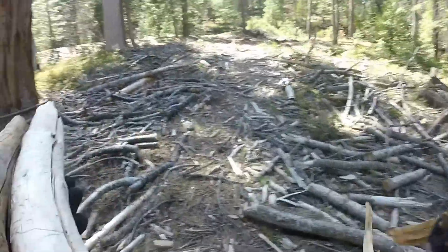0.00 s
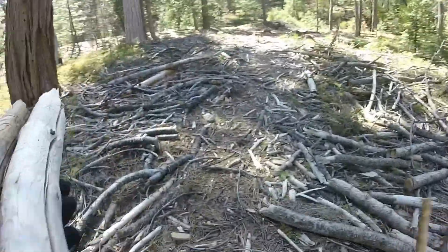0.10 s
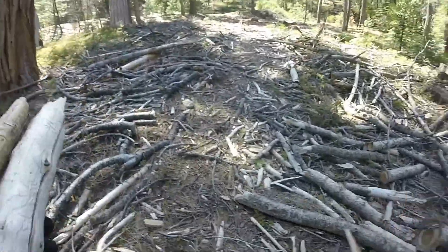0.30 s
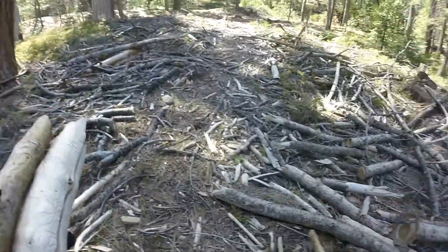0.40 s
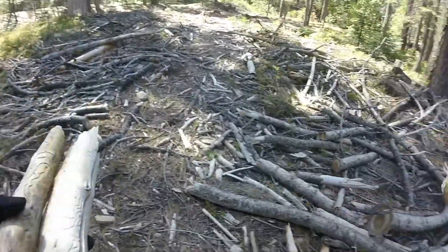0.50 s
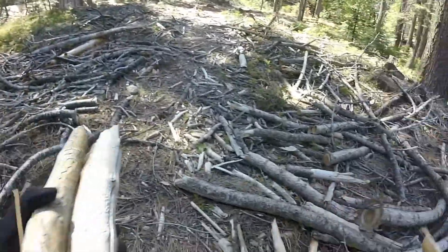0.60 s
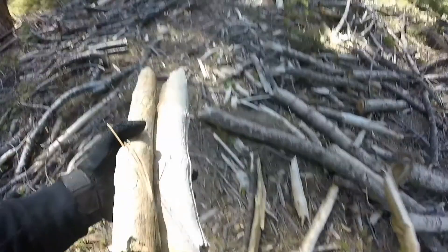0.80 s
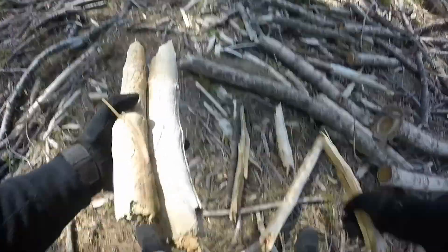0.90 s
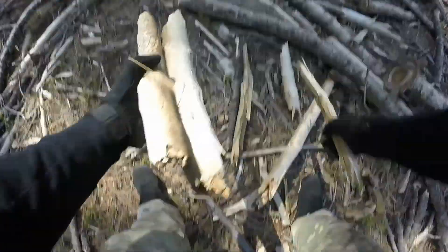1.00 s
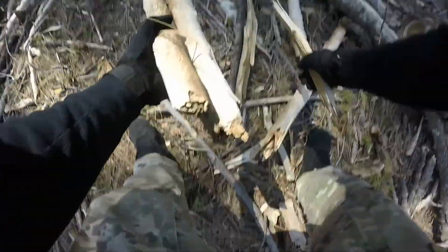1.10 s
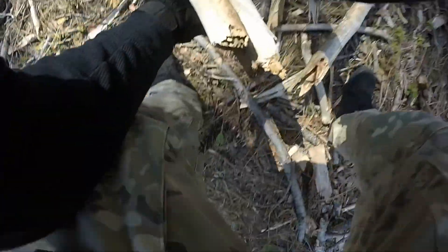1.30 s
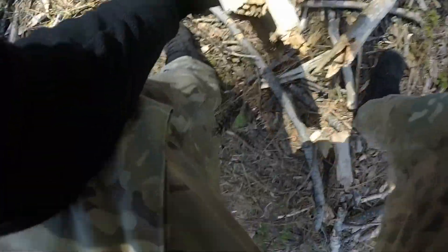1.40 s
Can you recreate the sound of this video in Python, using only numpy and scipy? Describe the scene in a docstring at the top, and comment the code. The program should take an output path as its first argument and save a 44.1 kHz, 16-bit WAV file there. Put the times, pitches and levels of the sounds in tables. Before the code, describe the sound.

Rotten dry wood cracks in a quick splintering cluster, pieces thudding on forest litter, then two logs knock together hollowly several times; gloves and bark rustle softly, light wind rumbling on a close body-worn microphone.

```python
"""Forest: rotten dry wood is broken by hand. Fibres crack as sprays of clicks, pieces thud on the litter as a
short push rings their modes, a thin stick taps likewise, and two held logs knock with a hollow, swelling ring.
Gloves, bark and needles rustle throughout as grainy coloured noise; light wind rumbles on the microphone.
"""
import sys
import numpy as np
from scipy import signal
from scipy.fft import rfft, irfft, next_fast_len
from scipy.io import wavfile
from scipy.ndimage import map_coordinates

SR = 44100
rng = np.random.default_rng(int(sys.argv[2]) if len(sys.argv) > 2 else 0)


def gain_from_db(level_db):
    """Turn a decibel level (scalar or array-like) into a linear amplitude factor."""
    decades = np.asarray(level_db, float) / 20
    return 10 ** decades


def inscribe(sig):
    """Save sig as 16-bit PCM at rate SR to the path in sys.argv[1].

    A 1-D sig is mono; a 2-D sig holds one channel per row.
    Samples are clipped to [-1, 1] before scaling.
    """
    pcm = np.round(np.clip(np.atleast_2d(sig).T, -1, 1) * 32767)
    wavfile.write(sys.argv[1], SR, pcm.astype(np.int16))


N = 66150


def along(points, hz):
    """Interpolate (f/Hz, level/dB) points on a log frequency axis."""
    f, v = np.transpose(points)
    return np.interp(np.log(hz + 1), np.log(f + 1), v)


def curves(rows):
    """One value per sample for each column after the time."""
    s, *cols = np.transpose(rows)
    return [np.interp(np.arange(N) / SR, s, c) for c in cols]


def wobble(knots_per_s):
    """Smooth random curve through normally distributed knots."""
    knots = rng.standard_normal(int(N * knots_per_s / SR) + 4)
    return map_coordinates(knots, [np.arange(N) * knots_per_s / SR])


def add(out, s, peak_db, x):
    """Mix a sound in at a time and peak level."""
    start = max(round(s * SR), 0)
    out[start:][:len(x)] += gain_from_db(peak_db) * x / np.abs(x).max()


def resonance(f, centre_hz, width_hz):
    """Second-order band-pass response, unity at its centre."""
    damping = 1j * f * width_hz
    return damping / (centre_hz ** 2 - f * f + damping)


def ring(modes, pitch, t):
    """Sum of decaying sine modes of a piece of wood, their levels scattered at each strike."""
    scatter_db = 1.5
    hz, db, t60_s = np.transpose(modes)[:, :, None]
    db = db + rng.normal(0, scatter_db, db.shape)
    return np.sum(gain_from_db(db - 60 * t / t60_s) * np.sin(2 * np.pi * hz * pitch * t), axis=0)


def rush(spectrum, grainy_db, grains_per_s):
    """Noise with flickering level, coloured by a spectrum in dB per Hz and scaled to rms 1."""
    m = next_fast_len(N + 8192)
    noise = rng.standard_normal(N) * gain_from_db(grainy_db * wobble(grains_per_s))
    colour = gain_from_db(along(spectrum, np.fft.rfftfreq(m, 1 / SR)))
    y = irfft(rfft(noise, m) * colour, m)[:N]
    return y / y.std()


# fibres tearing: t/s, peak level before the bass cut/dB, t60/s, centre f/Hz, broad treble re centre/dB
FIBRE_CRACKS = [(.0004, -28, 0.021, 3200, -15), (.042, -35.5, 0.077, 5700, -9),
                (.064, -28.5, 0.038, 2070, -28), (0.128, -21.5, 0.011, 3200, -2),
                (0.1461, -35, .02, 2100, -30), (0.171, -30.5, 0.0078, 2180, -42),
                (0.2108, -12, 0.025, 3220, -19), (0.2149, -10.5, 0.0092, 4760, -25),
                (0.2144, -15, 0.013, 2130, -38), (0.2234, -31, 0.066, 4600, -47),
                (0.2738, -24, 0.021, 2500, -7), (0.2928, -20, 0.024, 2650, -3.5),
                (0.3255, -15, 0.012, 2310, -21), (0.3358, -9.5, 0.031, 2520, -23.5),
                (0.347, -31.5, 0.052, 4600, -22), (0.4129, -27, 0.058, 2440, -17.5),
                (0.4684, -18, 0.032, 2000, -30), (.785, -43, 0.035, 4840, -1),
                (1.1483, -15.5, 0.012, 1730, -51), (1.1486, -41, 0.021, 5100, -10),
                (1.4942, -24.5, 0.099, 4080, -56)]


def cracks():
    """Each crack: a dying spray of fibre clicks in its own band, unevenly coloured, with crumbs trailing."""
    clicks_per_s, width_over_centre = 5100, 0.93
    crumbs_db, crumbs_t60_s = -29.5, 0.08
    reflection_db, reflection_max_s = -6.5, 0.000804  # short reflections off the ground colour each crack unevenly
    out, size = np.zeros(N + SR), 8192
    t, f = np.arange(size) / SR, np.fft.rfftfreq(size, 1 / SR) + 1
    treble = (1j * f / (4000 + 1j * f)) ** 2 / (1 + 1j * f / 9000)
    crumbs = gain_from_db(crumbs_db - 60 * t / crumbs_t60_s)
    for s, peak_db, t60_s, centre_hz, treble_db in FIBRE_CRACKS:
        chance, height = rng.random((2, size))
        clicks = (chance < clicks_per_s / SR) * (2 * height - 1) ** 3
        clicks += 0.79 * (t == 0) + 0.021 * rng.standard_normal(size)  # first snap, fine hiss
        spray = clicks * (gain_from_db(-60 * t / t60_s) + crumbs)
        band = resonance(f, centre_hz, width_over_centre * centre_hz) ** 3
        delay_s = reflection_max_s * rng.random((2, 1))
        uneven = np.prod(1 + gain_from_db(reflection_db) * np.exp(-2j * np.pi * f * delay_s), axis=0)
        crack = irfft(rfft(spray) * uneven * (band + gain_from_db(treble_db) * treble), size)
        add(out, s, peak_db, crack[:size // 2])
    return out[:N]


def strike(modes, hits):
    """A half-sine push, as long as the contact, rings the modes; the slope of the motion is heard."""
    out, t = np.zeros(N + SR), np.arange(SR // 8) / SR
    for s, peak_db, pitch, contact_s in hits:
        push = np.sin(np.pi * np.clip(t[:400] / contact_s, 0, 1))
        motion = np.convolve(ring(modes, pitch, t), push)[:len(t)]
        add(out, s, peak_db, -np.gradient(motion))
    return out[:N]


# pieces landing: t/s, peak level before the bass cut/dB, pitch re modes/ratio, contact/s
PIECE_THUDS = [(0.3239, -2, 1.0, 0.001072), (0.3353, -1.5, 1.005, 0.000922), (0.3474, -17.5, 0.33, 0.0013),
               (1.4942, -17, 1.04, 0.00201), (1.4972, -16.5, 1.41, 0.001)]
# modes of the heavy piece at pitch 1: f/Hz, relative level before push and slope/dB, t60/s
PIECE_MODES = [(150.2, 6, 0.078), (257, -12, 0.064), (342.3, 5.5, 0.068), (445, -3, 0.031),
               (607, 22, 0.014), (788, 15.5, 0.01), (1083, 11.5, 0.039), (1280, 11, 0.026),
               (1567, 8, 0.043), (1928, 16.5, 0.014), (2340, 11, 0.063)]


def thuds():
    """Heavy pieces land on the litter: a short contact rings their modes."""
    return strike(PIECE_MODES, PIECE_THUDS)


# stick jolted or dropped: t/s, peak level before the bass cut/dB, pitch re modes/ratio, contact/s
STICK_TAPS = [(0.2133, -16.5, .98, 0.0011), (.2935, -23, 0.93, 0.00086), (0.411, -13, 1.01, 0.00096),
              (0.4192, -20.5, .9, 0.00088), (.729, -35, 1, 0.0016), (.782, -32, 0.92, 0.0017),
              (.79, -28, 1.2, 0.0019), (0.802, -35.5, 0.56, 0.00073)]
# modes of the thin stick at pitch 1: f/Hz, relative level before push and slope/dB, t60/s
STICK_MODES = [(397, 3, 0.028), (724, 6, 0.02), (895, -2, 0.044), (1356, -2, 0.039)]


def taps():
    """The thin stick is jolted or dropped: a short contact rings its modes."""
    return strike(STICK_MODES, STICK_TAPS)


# logs meeting: t/s, peak level before the bass cut/dB, pitch re modes/ratio, rise/s
LOG_KNOCKS = [(.0002, -21.5, 0.82, 0.0003), (.170, -31.5, 1.04, 0.0029), (.2955, -26.5, 0.84, 0.0073),
              (.3385, -8.5, 1.06, 0.0025), (.712, -37.5, 0.87, .001), (0.8123, -7.5, 1.05, 0.0016),
              (0.8374, -25, 0.79, 0.00069), (.890, -16, 1, 0.0025), (0.9839, -25.5, 1.04, 0.00066),
              (1.0575, -29, 1.26, 0.00075), (1.0646, -15.5, 0.98, 0.0023), (1.0782, -22, 1.2, 0.00084),
              (1.0812, -15, 0.97, 0.0027), (1.1479, -5.5, 1, 0.0026)]
# modes of the logs at pitch 1: f/Hz, relative level/dB, t60/s
LOG_MODES = [(582, -11, 0.031), (752.7, 6, 0.031), (821, 10, 0.016), (979, -12, 0.034),
             (1238, -10.5, 0.016), (1730, -17.5, 0.033)]


def knocks():
    """Soft rotten logs meet: the ring swells gradually, then dies."""
    out, t = np.zeros(N + SR), np.arange(SR // 8) / SR
    for s, peak_db, pitch, rise_s in LOG_KNOCKS:
        swell = 1 - np.exp(-(t / rise_s) ** 2)
        add(out, s, peak_db, ring(LOG_MODES, pitch, t) * swell)
    return out[:N]


# gloves, bark and litter, before the shared wobble: t/s, body level/dB, scrape level/dB, treble level/dB
RUSTLE_LEVELS = [(0, -37, -39.5, -65), (.03, -41, -55, -58.5), (.1, -44.5, -52, -61),
                 (.16, -45, -52.5, -61), (.25, -47, -55.5, -71), (.4, -46, -61, -71),
                 (.52, -44.5, -56.5, -62), (.7, -52, -57.5, -66), (.73, -40.5, -56, -64),
                 (.8, -44, -51, -59.5), (.93, -50.5, -60, -71.5), (.975, -47.5, -50, -71),
                 (1.03, -45, -47, -67), (1.09, -47, -45.5, -68), (1.12, -50, -59.5, -75.5),
                 (1.19, -50, -60.5, -74.5), (1.33, -49, -54, -69.5), (1.5, -48, -58.5, -68.5)]
# layer spectra, relative: f/Hz, level per Hz/dB
BODY_SPECTRUM = [(80, -17), (130, -8.5), (300, -5), (450, -5.5), (750, -3.5), (1000, -10.5), (1300, -26.5),
                 (1800, -49)]
SCRAPE_SPECTRUM = [(700, -32), (1150, 3), (1500, -1.5), (2400, 2.5), (3100, -3.5), (4300, -11.5),
                   (5600, -15.5), (6600, -38), (9000, -47)]
TREBLE_SPECTRUM = [(3200, -17), (5500, -9.5), (7000, -7.5), (13400, -15.5), (15300, -8), (16300, -61)]


def rustle():
    """Rubbing as three grainy noise layers that share one level wobble."""
    body_db, scrape_db, treble_db = curves(RUSTLE_LEVELS)
    shared_db = 1.1 * wobble(38.86)
    body = gain_from_db(body_db + shared_db) * rush(BODY_SPECTRUM, grainy_db=2.5, grains_per_s=120)
    scrape = gain_from_db(scrape_db + shared_db) * rush(SCRAPE_SPECTRUM, grainy_db=2.0, grains_per_s=100)
    treble = gain_from_db(treble_db + shared_db) * rush(TREBLE_SPECTRUM, grainy_db=3.0, grains_per_s=300)
    return body + scrape + treble


# wind on the microphone: t/s, level/dB
WIND_LEVEL = [(0, -55), (.25, -49.5), (.4, -49.5), (.65, -52), (.82, -49.5), (.97, -48), (1.2, -53),
              (1.5, -48.5)]
# rumble spectrum, relative: f/Hz, level per Hz/dB
RUMBLE_SPECTRUM = [(31, -0.5), (59, -7), (130, -12.5), (170, -48.5)]


def wind():
    """Light wind on the microphone: low noise with a slowly changing level."""
    return gain_from_db(curves(WIND_LEVEL)[0]) * rush(RUMBLE_SPECTRUM, grainy_db=1.0, grains_per_s=43)


def scatter(wood):
    """Diffuse echo from ground and trunks: a decaying noise tail of unit energy, scaled down."""
    echo_db, echo_t60_s, onset_s = -24, 0.09, 0.004
    t = np.arange(SR // 4) / SR
    tail = rng.standard_normal(len(t)) * gain_from_db(-60 * t / echo_t60_s) * (t > onset_s)
    return gain_from_db(echo_db) * signal.fftconvolve(wood, tail / np.linalg.norm(tail))[:N]


def scene():
    """Wood without bass, as small pieces radiate none, plus its scatter, over rustle and wind."""
    bass_cut_hz = 120.6
    wood = cracks() + thuds() + taps() + knocks()
    wood = signal.sosfilt(signal.butter(6, bass_cut_hz, "high", fs=SR, output="sos"), wood)
    return (wood + scatter(wood) + rustle() + wind())[None]


# resonances of the housing around the microphone: f/Hz, width/Hz, gain of each alone at its centre/dB
HOUSING_MODES = [(2440, 152, 3), (4600, 350, 6), (5740, 520, 7)]


def housing(dry):
    """Resonances of the housing boost narrow bands over a flat response."""
    m = next_fast_len(N + 8192)
    f = np.fft.rfftfreq(m, 1 / SR)
    gain = 1 + sum((gain_from_db(db) - 1) * resonance(f, hz, width_hz) for hz, width_hz, db in HOUSING_MODES)
    return irfft(rfft(dry, m) * gain, m)[:, :N]


def top_cut(x):
    """Nothing passes above the cut-off."""
    return signal.sosfilt(signal.butter(12, 16230, fs=SR, output="sos"), x)


def record(dry):
    """The housing colours the sound, loud peaks saturate softly, the microphone rolls off the top."""
    top_hz = 14000
    saturated = np.tanh(housing(dry))
    mix = signal.sosfilt(signal.butter(8, top_hz, fs=SR, output="sos"), saturated)
    return top_cut(mix)


dry = scene()
out = record(dry)
inscribe(out)
```